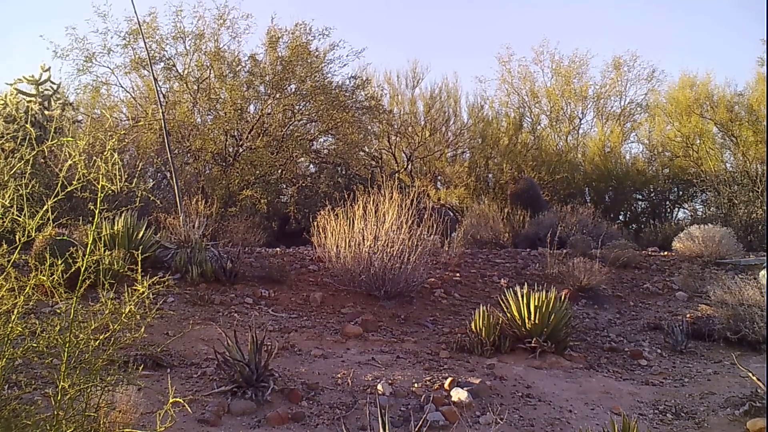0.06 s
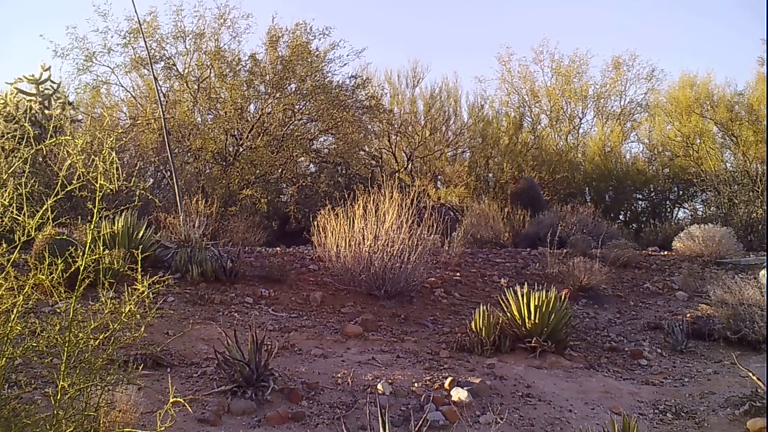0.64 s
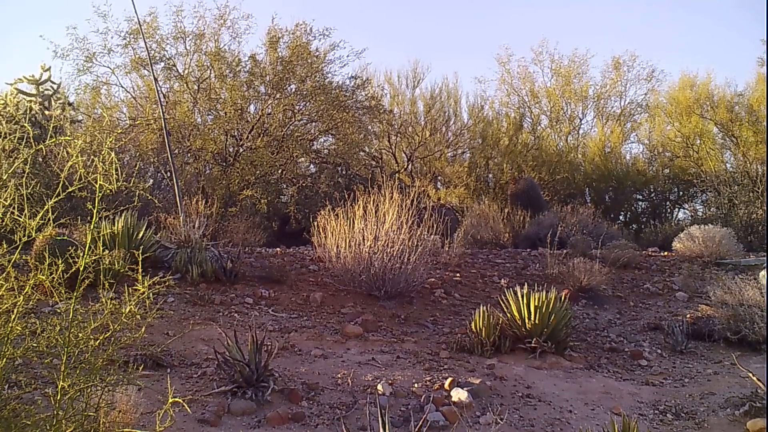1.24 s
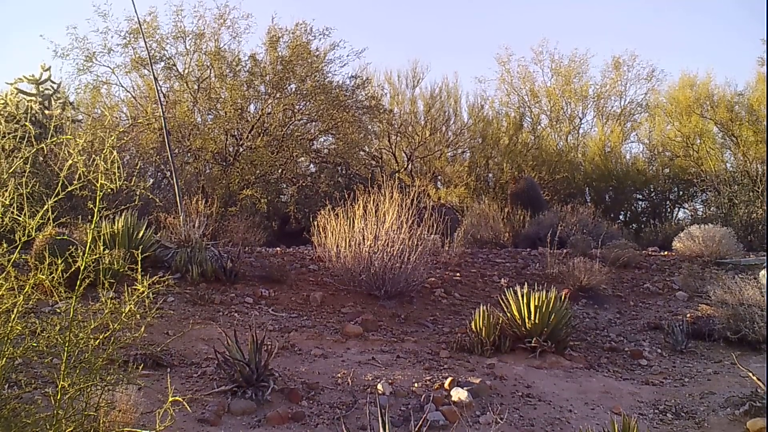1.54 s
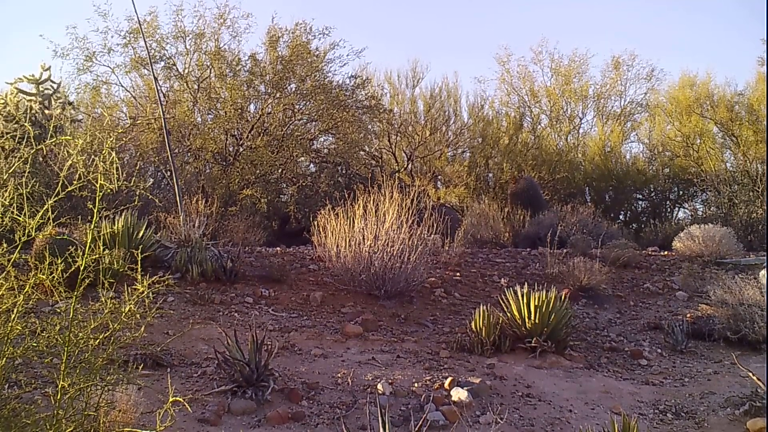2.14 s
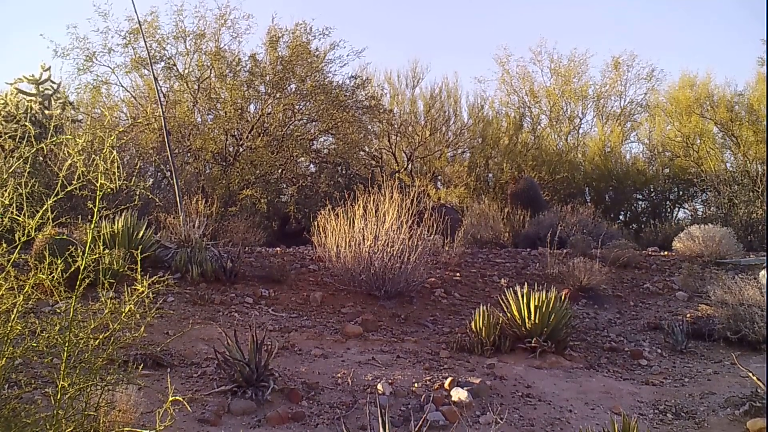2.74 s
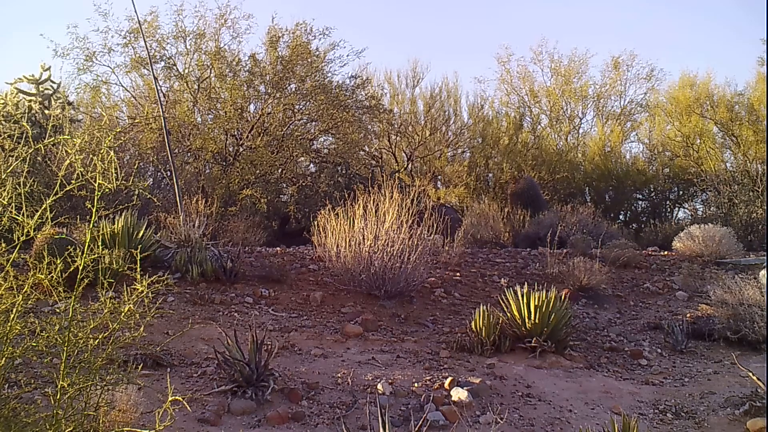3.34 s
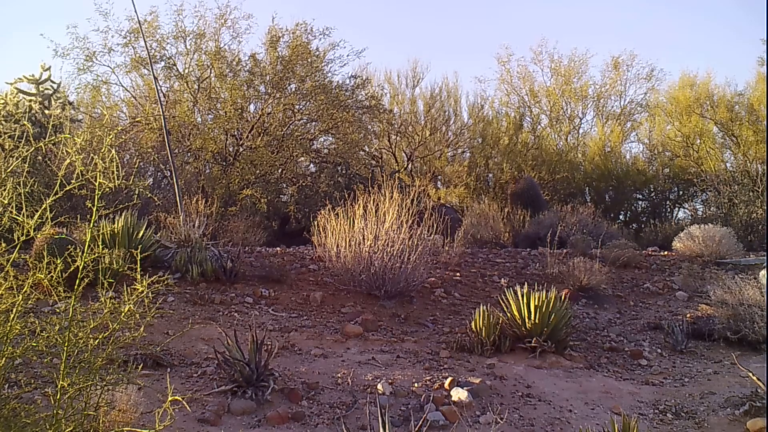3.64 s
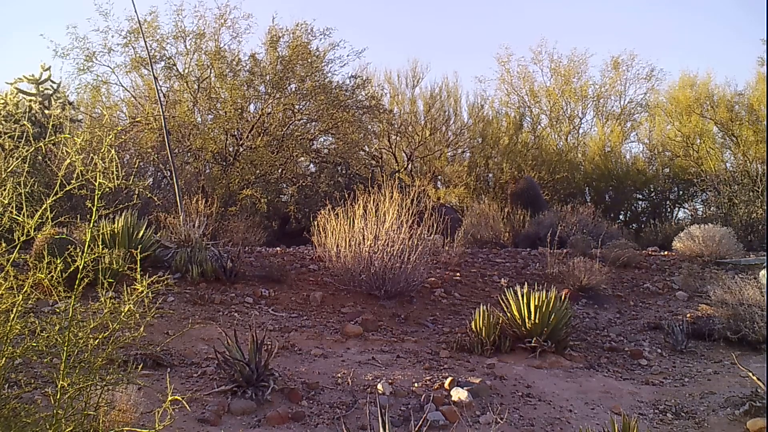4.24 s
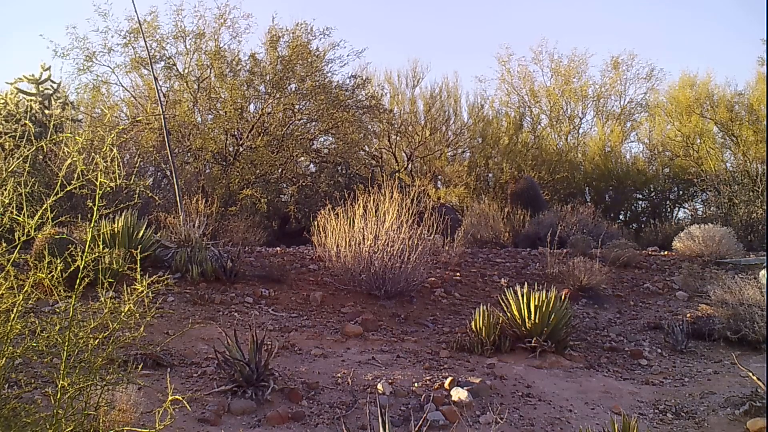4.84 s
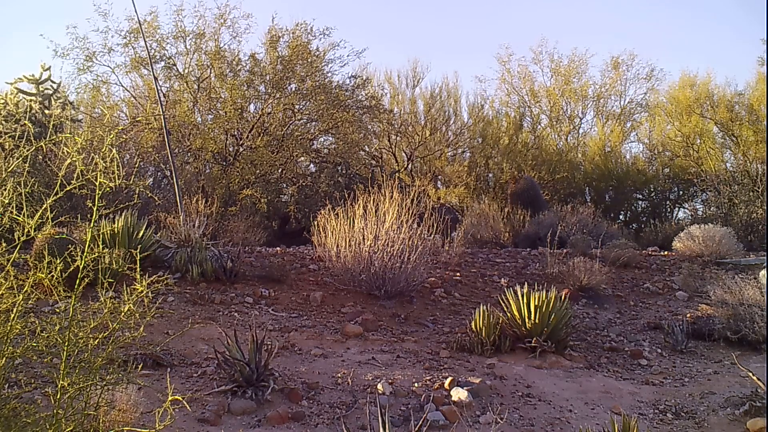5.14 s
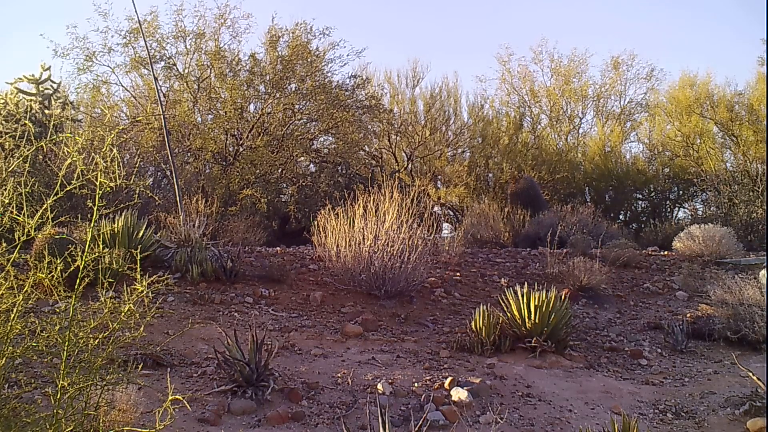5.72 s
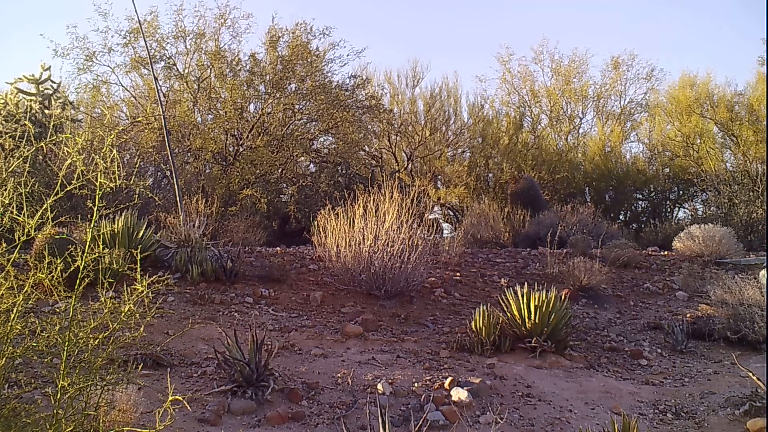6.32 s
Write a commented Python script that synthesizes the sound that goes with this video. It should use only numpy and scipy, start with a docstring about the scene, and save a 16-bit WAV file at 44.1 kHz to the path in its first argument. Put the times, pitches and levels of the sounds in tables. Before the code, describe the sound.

Runs of quick nasal bird notes ring out over quiet desert scrub, with distant replies, small chips and wind buffeting the microphone.

```python
"""In stony desert scrub, a bird calls in runs of short, nasal, arched notes, each a stack of harmonics
shaped by its throat. Bushes and ground scatter every note back. Another bird answers from far off,
small birds rasp and chip, a hoarse cry carries faintly, and dry twigs brush once.
Gusts buffet the microphone, once as hard as a knock. Under it all lie quiet open air and the
hiss and faint regular ticking of the camera."""
import sys
import numpy as np
from scipy import signal
from scipy.fft import rfft, irfft, next_fast_len
from scipy.io import wavfile
from scipy.ndimage import uniform_filter1d

SR = 44100
rng = np.random.default_rng(int(sys.argv[2]) if len(sys.argv) > 2 else 0)


def unload_audio(sound):
    """Save the sound as a 16-bit wav file, at the path given as the first command line argument."""
    columns = np.transpose(np.atleast_2d(sound))
    # keep every value between -1 and 1, then stretch to whole-number steps
    steps = np.round(np.clip(columns, -1, 1) * 32767)
    wavfile.write(sys.argv[1], SR, steps.astype(np.int16))


N = 290178
TIME, HZ = np.arange(N) / SR, np.fft.rfftfreq(N, 1 / SR)


def amp(db):
    """Turns decibels into a number to multiply a sound by."""
    return 10 ** (np.asarray(db) / 20)


def unit(x):
    """Scales a sound to an average strength (rms) of 1."""
    return x / np.sqrt(np.mean(x ** 2) + 1e-20)


def curve(points, at):
    """Joins the points with straight lines and reads off the value in between."""
    return np.interp(at, *np.transpose(points))


def level_at(points, hz):
    """Reads the level at a frequency from (frequency, level) points, spaced by octaves."""
    point_hz, db = np.transpose(points)
    return np.interp(np.log(hz + 1), np.log(point_hz), db)


def add(mix, start, sound):
    """Mixes a sound in at a start time in seconds."""
    at = int(round(start * SR))
    sound = sound[max(-at, 0):]
    part = mix[max(at, 0):][:len(sound)]
    part += sound[:len(part)]


def wobble(size, hz):
    """A smooth random wiggle that changes about hz times a second."""
    smoothing = signal.butter(2, hz, fs=SR, output="sos")
    return unit(signal.sosfilt(smoothing, rng.standard_normal(size)))


def band_noise(size, hz, below, above):
    """Noise around hz; the bigger `below` and `above` are, the faster it falls off on that side."""
    ratio = np.fft.rfftfreq(size, 1 / SR) / hz + 1e-6
    spectrum = rfft(rng.standard_normal(size)) / np.hypot(ratio ** -below, ratio ** above)
    return unit(irfft(spectrum, size))


def puffs(rows, below, above):
    """Bursts of noise that swell and die away."""
    out = np.zeros(N)
    for middle, length, db, hz in rows:
        size = next_fast_len(int(1.6 * length * SR))  # extra room for the quiet ends
        burst = amp(db) * np.hanning(size) * band_noise(size, hz, below, above)
        add(out, middle - size / SR / 2, burst)
    return out


# The tone of the steady hiss: (frequency [Hz], relative level [dB])
AIR_TONE = [(30, 4.5), (100, -10.5), (250, 1.5), (550, 3.5), (1400, 0.5), (2250, -1), (2600, 2), (3000, 2),
            (3900, -5.5), (5000, -9), (6000, -12.5), (9800, -13), (12000, -17.5), (15700, -20.5)]

def air():
    """Steady distant air and microphone hiss."""
    spectrum = rfft(rng.standard_normal(N)) * amp(level_at(AIR_TONE, HZ))
    return amp(-60) * unit(irfft(spectrum, N))


def camera(tick_db, tick_seconds, whine_db):
    """The camera gives a thin whine and twenty tiny rising ticks a second."""
    out = amp(whine_db) * np.sin(2 * np.pi * 11025 * TIME)
    hz = np.geomspace(2600, 10500, int(tick_seconds * SR))
    tick = np.sin(2 * np.pi * np.cumsum(hz) / SR) * signal.windows.tukey(len(hz), .4)
    for start in np.arange(.0347, N / SR, .050005):
        add(out, start, amp(tick_db + 2 * rng.standard_normal()) * tick)
    return out


# A brush of twigs: (middle time [s], length [s], level [dB], frequency [Hz])
TWIG_BRUSH = [(.565, 0.17, -64.5, 6370)]

def twigs():
    """Dry twigs brush together in a soft, high hiss."""
    return puffs(TWIG_BRUSH, below=.67, above=3)


# How the breeze rises and falls: (time [s], level [dB])
BREEZE_LEVELS = [(0, -61), (1.3, -50), (1.6, -64), (2.3, -57.5), (2.9, -58.5), (3.5, -57), (4.3, -65.5),
                 (4.7, -70.5), (5, -76), (5.8, -76.5), (6.05, -61.5), (6.58, -66)]

def breeze(lumpy_db):
    """Moving air makes a low, lumpy rumble on the microphone."""
    rumble = band_noise(N, 111, below=.23, above=2.36)
    lumps = amp(lumpy_db * wobble(N, 19))
    return amp(curve(BREEZE_LEVELS, TIME)) * unit(rumble * lumps)


def add_swirl(mix, middle, db):
    """A swirl of air pushes the microphone for a cycle or so; harder swirls are quicker."""
    t = np.arange(-600, 600) / SR
    hz = 402 * 2 ** ((db + 25) / 21.5)  # an octave higher for every 21.5 dB
    push = amp(db) * np.cos(2 * np.pi * (hz * t + rng.random())) / np.cosh(hz * t / .2)
    add(mix, middle + t[0], push)


# Gusts of wind: (middle time [s], length [s], level [dB])
WIND_GUSTS = [(.045, .19, -38), (0.191, 0.054, -41.5), (0.279, .12, -37.5), (.41, 0.13, -42.5),
              (0.525, 0.038, -44), (0.724, 0.066, -53), (0.947, 0.041, -43), (1.01, .036, -44),
              (1.204, 0.021, -28), (1.227, .008, -25), (1.221, 0.18, -44), (1.734, .045, -43),
              (1.891, 0.077, -50), (2.444, .17, -46), (2.679, 0.17, -45.5), (3.126, 0.039, -53),
              (3.45, .2, -59.5), (4.07, .046, -54.5), (6.11, 0.033, -44.5), (6.288, 0.028, -54)]
# The hardest swirls, which pop on the microphone: (time [s], level [dB])
HARD_SWIRLS = [(.1111, -19), (.1314, -25.5), (.2728, -18), (.4392, -26), (.4595, -22), (.9516, -23),
               (1.1735, -27), (1.1872, -15), (1.206, -17.5), (1.2254, -11.5), (1.7428, -32), (2.3842, -38),
               (2.4905, -26), (2.6744, -26.5), (2.8697, -34.5), (6.1212, -30)]

def gusts(swirls_per_second):
    """Gusts buffet the microphone with rumbles and swirls; harder gusts sound brighter."""
    rumbles, swirls = [], list(HARD_SWIRLS)
    for middle, length, db in WIND_GUSTS:
        hz = 186 * 2 ** ((db + 44.5) / 11.5)  # an octave higher for every 11.5 dB
        rumbles.append((middle, length, db, hz))
        count = round(swirls_per_second * length)
        for when, force in np.tanh(rng.standard_normal((count, 2))):  # each between -1 and 1
            swirls.append((middle + .5 * length * when, db + 8 + 3.5 * force))
    out = puffs(rumbles, below=.44, above=2.88)
    for middle, db in swirls:
        add_swirl(out, middle, db)
    return out


# The two parts of one cry: (middle time [s], length [s], level [dB], pitch [Hz])
CRY_PARTS = [(6.47, 0.27, -63.5, 975), (6.44, 0.18, -67, 1300)]

def distant_cry():
    """A faint, hoarse cry: noise so narrow that it almost has a pitch."""
    return puffs(CRY_PARTS, below=18, above=17)


# Small birds' rasps: (middle time [s], length [s], level [dB], frequency [Hz])
BIRD_RASPS = [(.708, 0.043, -46.5, 2274), (.782, 0.037, -50, 2380), (.925, .04, -56.5, 2540),
              (2.12, 0.036, -61, 2420)]

def rasps():
    """Small birds rasp in short, dry bursts of noise."""
    return puffs(BIRD_RASPS, below=2.9, above=3.4)


# Small birds' chips:
# (start [s], length [s], first pitch [Hz], middle pitch [Hz], last pitch [Hz], level [dB])
BIRD_CHIPS = [(1.314, 0.083, 3166, 3857, 3280, -60.5), (3.935, 0.057, 3364, 3830, 3990, -66),
              (5.798, 0.057, 2554, 3150, 3550, -52.5), (5.799, 0.029, 2930, 3490, 4060, -58.5),
              (5.925, 0.037, 2780, 3130, 3600, -59)]

def chips():
    """Small birds give almost pure whistles that slide through three pitches."""
    out = np.zeros(N)
    for start, length, first_hz, middle_hz, last_hz, db in BIRD_CHIPS:
        progress = np.linspace(0, 1, int(length * SR))
        slide = np.polyfit([0, .5, 1], [first_hz, middle_hz, last_hz], 2)
        hz = np.polyval(slide, progress) * (1 + .0087 * wobble(len(progress), 500))
        whistle = np.sqrt(2) * np.sin(2 * np.pi * np.cumsum(hz) / SR)
        add(out, start, amp(db) * np.sin(np.pi * progress) * whistle)
    return out


def scrub_echo(sound, bush_db, bush_seconds, tree_db, tree_seconds):
    """Ground and bushes scatter a sound back quickly; the trees behind add a thin, longer tail."""
    t = np.arange(int(.8 * SR)) / SR
    fade_in = np.clip(t / .0058 - .5, 0, 1)
    tail = np.zeros(len(t))
    for db, seconds in ((bush_db, bush_seconds), (tree_db, tree_seconds)):
        echoes = rng.standard_normal(len(t)) * (rng.random(len(t)) < 4000 / SR)  # about 4000 a second
        echoes *= fade_in * amp(-60 * t / seconds)
        tail += amp(db) * echoes / np.linalg.norm(echoes)
    return signal.oaconvolve(sound, tail)[:N]


# A note slides up, holds, climbs to its top, then breaks downward.
# The opening slide at full depth: (time after start [s], pitch [times the held pitch])
OPENING_PITCH = [(0, 0.85), (.011, .98), (.021, 1.018), (.037, 1), (.048, 1.08)]
# The top of the arch: (time from break [s], pitch [times the top pitch])
TOP_PITCH = [(-.033, 0.98), (-.016, 0.99), (-.006, 0.99)]
# The closing fall: (time after break [s], pitch [Hz])
FALLING_PITCH = [(0, 1524), (.007, 1236), (.017, 1039), (0.034, 950)]
# The bird's effort, which eases in mid-note: (time after start [s], level change [dB])
NOTE_EFFORT = [(0, -15), (.004, -10), (.011, -3), (.038, -3.5), (.052, -4), (.066, -1)]
# An extra push as the note breaks: (time from break [s], level change [dB])
BREAK_PUSH = [(-.008, 0), (0, 1.5), (.007, 0)]

def bird_notes(notes, throat, slide, jitter, top_jitter, flutter, uneven_db, drop_db):
    """Arched notes, rougher at the top; the throat boosts some harmonics (multiples of the pitch)."""
    out, last_break = np.zeros(N), 0
    for start, break_time, held_hz, top_hz, db in notes:
        rested = start - last_break > .5  # after a rest, a note opens flatter and a touch louder
        last_break = break_time
        depth = slide * (.28 if rested else 1)
        t = np.arange(start, break_time + .027, 1 / SR)
        strain = np.interp(t, [start + .025, break_time - .024], [0, 1])

        arch = [(start + s, held_hz * ratio ** depth) for s, ratio in OPENING_PITCH]
        arch += [(break_time + s, top_hz * ratio) for s, ratio in TOP_PITCH]
        arch += [(break_time + s, hz) for s, hz in FALLING_PITCH]
        hz = uniform_filter1d(curve(sorted(arch), t), size=200)  # round off the corners
        hz *= 1 + (jitter + top_jitter * strain) * wobble(len(t), 480)  # the pitch shakes
        cycles = np.cumsum(hz) / SR

        voice = np.zeros(len(t))
        for harmonic in range(1, 7):
            harmonic_db = level_at(throat, harmonic * hz) + uneven_db * wobble(len(t), 78)
            voice += amp(harmonic_db) * np.sin(2 * np.pi * harmonic * cycles)

        effort_db = db + curve(NOTE_EFFORT, t - start) + curve(BREAK_PUSH, t - break_time)
        effort_db += .5 * rested * (1 - strain)
        fade_db = np.interp(t - break_time, [0, .022, .039], [0, drop_db, -22])
        tremble = 1 + flutter * strain * wobble(len(t), 360)
        add(out, start, np.sqrt(2) * voice * amp(effort_db + fade_db) * tremble)
    return out


# The far bird's notes: (start [s], held pitch [Hz], base level [dB])
FAR_BIRD_NOTES = [(1.974, 1396, -61), (2.292, 1368, -60.5), (2.626, 1355, -61), (3.319, 1376, -58.5),
                  (3.645, 1381, -55.5), (6.055, 1403, -59), (6.369, 1413, -55)]
# How its throat shapes the tone: (frequency [Hz], level change [dB])
FAR_BIRD_THROAT = [(1000, -11), (1400, -11), (2200, 2), (2850, -3), (3400, 4), (4100, -3.5), (4600, -38),
                   (5600, -24), (9000, -46)]

def far_bird():
    """A distant bird answers with lower, flatter notes that fade fast once they break."""
    notes = [(start, start + .096, hz, hz * 1.065, db) for start, hz, db in FAR_BIRD_NOTES]
    return bird_notes(notes, FAR_BIRD_THROAT, slide=.45, jitter=.005, top_jitter=.004,
                      flutter=.17, uneven_db=3.5, drop_db=-28)


# The near bird's notes: (start [s], break time [s], held pitch [Hz], top pitch [Hz], base level [dB])
NEAR_BIRD_NOTES = [(-.070, .025, 1535, 1663, -39), (.205, .303, 1527, 1644, -39),
                   (.487, .586, 1521, 1651, -40.5), (1.488, 1.584, 1476, 1681, -41),
                   (1.776, 1.871, 1514, 1712, -39), (2.918, 3.000, 1532, 1610, -43.5),
                   (3.173, 3.270, 1526, 1738, -38.5), (3.440, 3.535, 1565, 1703, -39),
                   (3.709, 3.804, 1566, 1745, -39), (3.980, 4.077, 1572, 1718, -39.5),
                   (4.858, 4.950, 1532, 1707, -41.5), (5.123, 5.225, 1553, 1750, -39.5),
                   (5.402, 5.500, 1564, 1765, -39.5), (6.528, 6.625, 1570, 1693, -42)]
# How its throat shapes the tone: (frequency [Hz], level change [dB])
NEAR_BIRD_THROAT = [(1000, -24), (1450, -15.5), (1750, -11.5), (2100, -14.5), (2600, -1.5), (3050, -1),
                    (3450, -9.5), (3900, -16.5), (4500, -17.5), (5100, -27), (6500, -35.5), (9000, -49)]

def near_bird():
    """The main bird calls in runs; its throat favours the second harmonic, which sounds nasal."""
    return bird_notes(NEAR_BIRD_NOTES, NEAR_BIRD_THROAT, slide=1, jitter=.0063, top_jitter=.011,
                      flutter=.26, uneven_db=2.04, drop_db=-4)


def scene():
    """Birds and their echoes, a quiet background and wind, mixed into one channel."""
    near = near_bird()
    far = far_bird() + chips() + rasps() + distant_cry()
    near += scrub_echo(near, bush_db=-14, bush_seconds=.22, tree_db=-7, tree_seconds=.48)
    far += scrub_echo(far, bush_db=-7.5, bush_seconds=.12, tree_db=-9.5, tree_seconds=.67)
    background = air() + twigs() + camera(tick_db=-65.5, tick_seconds=.011, whine_db=-89)
    wind = breeze(lumpy_db=6) + gusts(swirls_per_second=38)
    return (background + wind + far + near)[None]


def record(dry):
    """The camera's microphone has three narrow dips in the treble; the very highest sounds are cut."""
    # (frequency [Hz], half width [Hz], level change [dB])
    dips = [(5480, 200, -11.5), (10890, 470, -4.5), (13200, 460, -5)]
    colour_db = sum(db * np.exp(-((HZ - hz) / width) ** 2) for hz, width, db in dips)
    coloured = irfft(rfft(dry) * amp(colour_db), N)
    treble_cut = signal.firwin(511, 15750, window=("kaiser", 9), fs=SR)
    return signal.oaconvolve(coloured, treble_cut[None], "same")


dry = scene()
out = record(dry)
unload_audio(out)
```